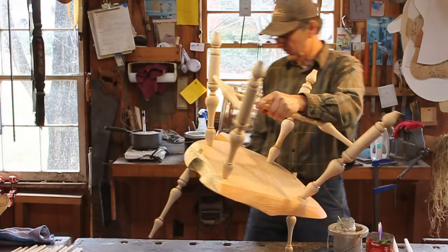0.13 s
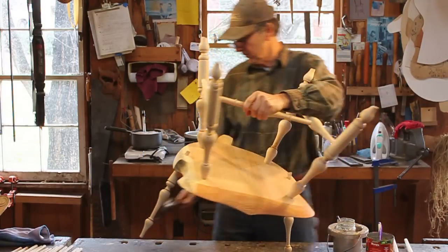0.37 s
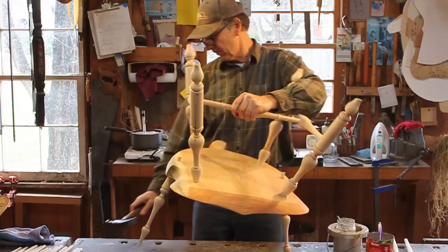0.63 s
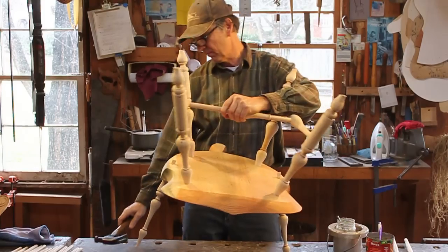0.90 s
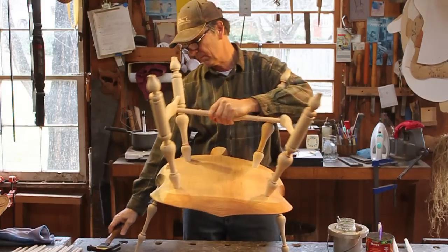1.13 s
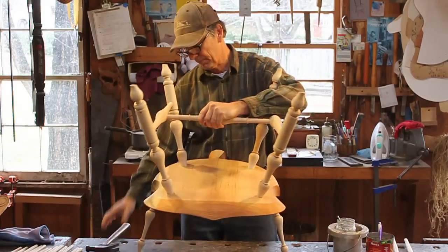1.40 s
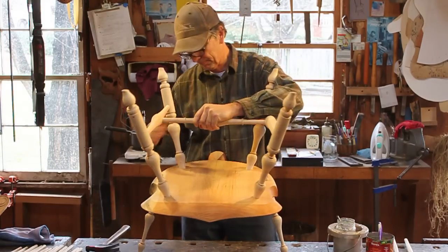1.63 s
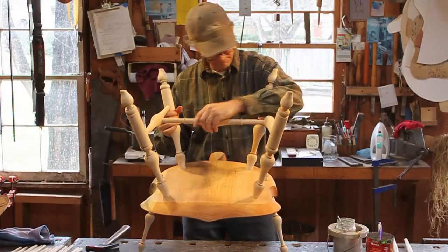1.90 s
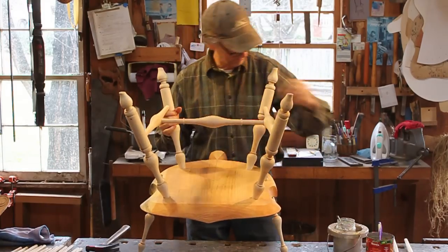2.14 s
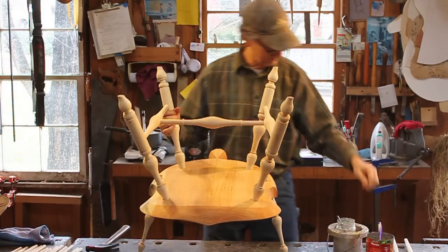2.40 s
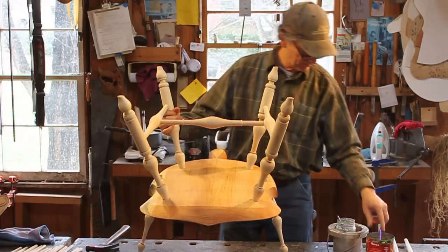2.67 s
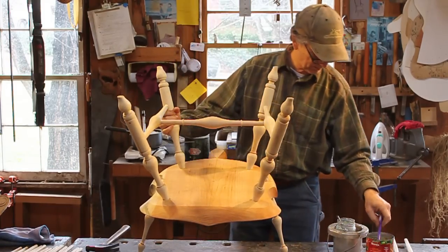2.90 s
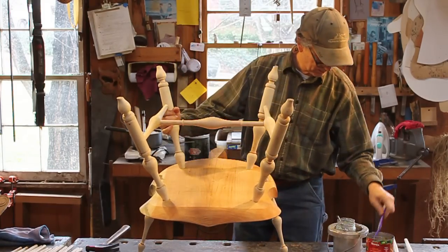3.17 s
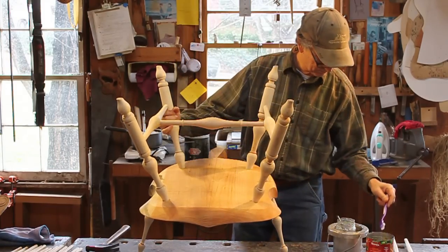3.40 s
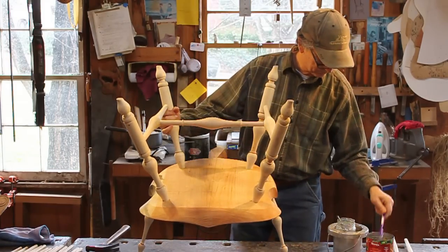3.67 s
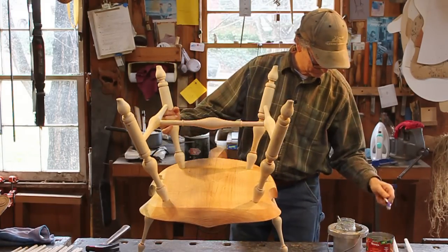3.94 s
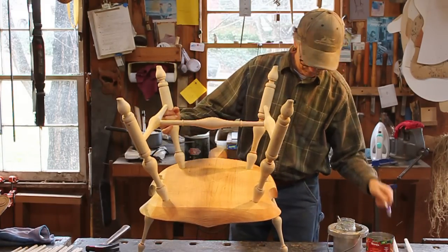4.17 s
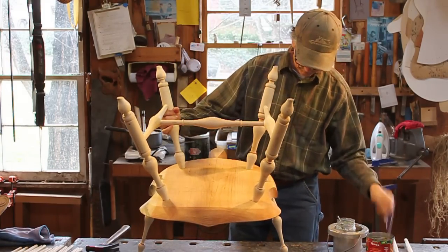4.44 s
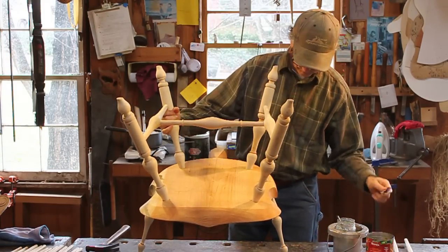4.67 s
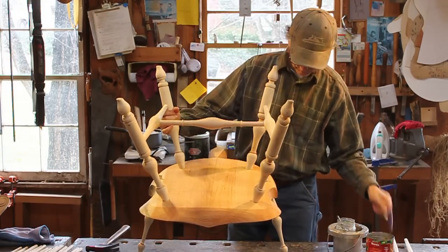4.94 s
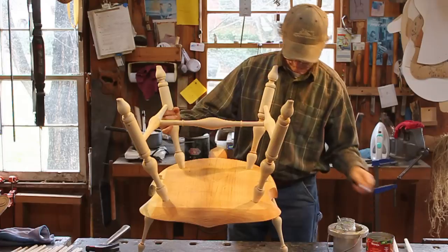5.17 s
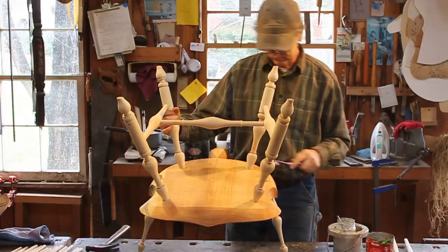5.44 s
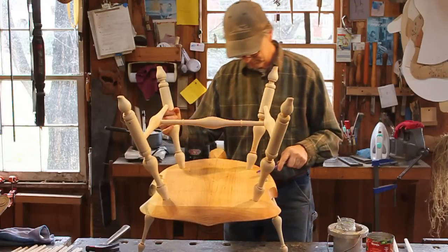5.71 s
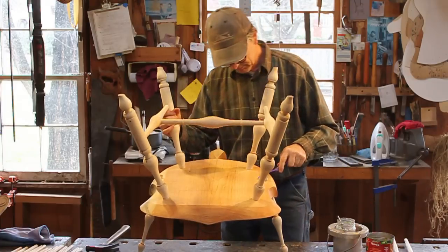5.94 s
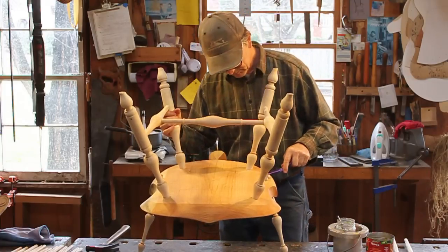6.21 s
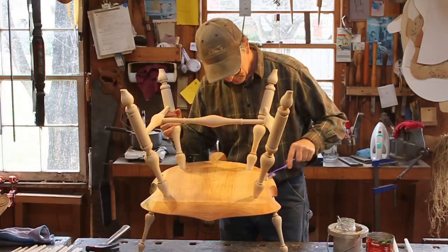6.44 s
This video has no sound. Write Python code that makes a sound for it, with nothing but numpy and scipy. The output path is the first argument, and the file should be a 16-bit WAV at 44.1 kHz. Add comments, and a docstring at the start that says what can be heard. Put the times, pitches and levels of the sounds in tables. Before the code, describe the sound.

A small, quiet wood workshop with soft clothing rustle and foot shuffle. A steel tool is set down with a sharp clack and short rattle on a wooden bench, followed by softer chair bumps. After a pause, a brush handle raps a tin can rim four times, bright and ringing but quickly damped, with short room reflections. Finally, faint bristles scrub inside a wooden socket. One fixed microphone, mono.

```python
"""Knocks of tools and a chair on a bench, then bright raps of a brush handle on a tin can rim, then brushing.
Raps: noisy cracks plus damped modes. Knocks: random contacts convolved with wood and steel modes.
Sleeves, feet, bristles and rumble are coloured noise under level curves; a faint hum wavers below.
The small shop answers knocks and raps with sparse taps that decay band by band. Both channels are equal."""
import sys
import numpy as np
from scipy import signal
from scipy.io import wavfile
from scipy.ndimage import uniform_filter1d

SR = 44100
rng = np.random.default_rng(int(sys.argv[2]) if len(sys.argv) > 2 else 0)


def dump_mix(stems):
    """Bounce the given channels to the path in sys.argv[1] as a 16-bit WAV at rate SR."""
    frames = np.atleast_2d(stems).T  # one column per channel
    limited = np.clip(frames, -1, 1)  # hard clip at full scale
    pcm = np.round(limited * 32767).astype(np.int16)
    wavfile.write(sys.argv[1], SR, pcm)


def invert_db(level):
    """Linear amplitude ratio for a level in decibels (20 dB per decade), elementwise."""
    return 10 ** (np.asarray(level, dtype=float) / 20)


N = 290178
SIDES = 3  # radiation directions; index 0 faces the microphone


def evened(x):
    """Scales to unit rms."""
    return x / np.sqrt(np.mean(x ** 2) + 1e-20)


def read(points, hz):
    """Interpolates a curve over log frequency."""
    f, value = np.transpose(points)
    return np.interp(np.log(hz + 1), np.log(f + 1), value)


def add(mix, s, sound):
    """Mixes a sound in at s seconds, cut at the end of the mix."""
    part = mix[:, round(s * SR):][:, :sound.shape[1]]
    part += sound[:, :part.shape[1]]


def ring(modes, weight_db, hold):
    """Damped sines at unit energy; strike spot and direction vary mode levels and signs."""
    hz, db, t60_s = np.transpose(modes)[:, :, None]
    t = np.arange(SR // 4) / SR
    luck_db = 1.5 * rng.standard_normal((SIDES, len(modes)))
    sign = rng.choice([-1., 1.], luck_db.shape)
    sign[0] = (-1.) ** np.arange(len(modes))
    envelope = invert_db(db + weight_db(hz) - 60 * t / (hold * t60_s))
    sines = envelope * np.sin(2 * np.pi * hz * t)
    sound = (sign * invert_db(luck_db)) @ sines
    return sound / np.linalg.norm(sound, axis=1, keepdims=True)


def hiss(spectrum, patchy_db, size):
    """Coloured noise at unit rms; level drifts in patches over time and frequency."""
    hop = size // 4
    frames, hz = N // hop + 5, np.fft.rfftfreq(size, 1 / SR)
    real, imag, patches = rng.standard_normal((frames, len(hz), 3)).T
    patches = uniform_filter1d(uniform_filter1d(patches, 12, 0), 12, 1)
    gain_db = read(spectrum, hz)[:, None] + patchy_db * evened(patches)
    bins = (real + 1j * imag) * invert_db(gain_db)
    return evened(signal.istft(bins, nperseg=size, noverlap=size - hop)[1][:N])


SWELL_DB = 3.5  # drop one rise time before and one fall time after the peak


def swell(s, rise_s, fall_s, db):
    """Bell-shaped gain with separate rise and fall."""
    t = np.arange(N) / SR - s
    drop_db = SWELL_DB * (t / np.where(t < 0, rise_s, fall_s)) ** 2
    return invert_db(db - np.minimum(drop_db, 200))


# building rumble spectrum: f/Hz, relative level/dB per Hz
RUMBLE_SPECTRUM = [(12, -74), (20, -27), (70, 12), (108, -35), (129, -43), (145, -10), (160, -9), (210, -7),
                   (350, -120)]
RUMBLE_DB = -76.5


def rumble():
    """Building rumble: patchy low-frequency noise."""
    return invert_db(RUMBLE_DB) * hiss(RUMBLE_SPECTRUM, patchy_db=2, size=2048)


# mains hum: f/Hz, level/dB rms before waver
MAINS_HUM = (119.5, -76.5)


def hum():
    """Mains hum: one sine whose level wavers slowly and randomly."""
    hz, db = MAINS_HUM
    waver = rng.standard_normal(N)
    waver = uniform_filter1d(uniform_filter1d(waver, SR // 5), SR // 5)
    level_db = db + 3 * evened(waver)
    return invert_db(level_db) * np.sqrt(2) * np.sin(2 * np.pi * hz * np.arange(N) / SR)


# room bands: f/Hz, t60/s, return level/dB before wet_db
SHOP_BANDS = [(118.4, 0.55, 14), (326, 0.47, 4.5), (860, 0.45, 7), (2200, 0.34, 4), (5880, 0.31, 0.5),
              (12900, 0.2, -6.5)]


def shop(x, wet_db):
    """Direct sound plus sparse random-sign wall taps per direction; each band has its own decay."""
    taps = np.zeros((SIDES, SR))
    at = np.arange(160, SR - 20, 20)
    at = at + rng.integers(0, 20, (SIDES, len(at)))
    np.put_along_axis(taps, at, rng.choice([-1., 1.], at.shape), 1)
    hz, t, bins = signal.stft(taps, SR, nperseg=256)
    band_hz, t60_s, back_db = np.transpose(SHOP_BANDS)
    t60_s = read(np.transpose([band_hz, t60_s]), hz)[:, None]
    back_db = read(np.transpose([band_hz, back_db]), hz)[:, None]
    decay = invert_db(-60 * t / t60_s)
    decay *= invert_db(back_db) / np.linalg.norm(decay, axis=1, keepdims=True)
    tail = signal.istft(bins * decay, SR, nperseg=256)[1]
    wet = signal.fftconvolve(x, tail, axes=1)[:, :N].sum(0) / np.sqrt(SIDES)
    return x[0] + invert_db(wet_db) * wet


# worker activity: t/s, level/dB
BUSTLE_CURVE = [(0, -14), (0.25, -9), (0.4, -5), (1.0, -8), (1.8, -5.5), (2.5, -3), (3.1, 2.5), (3.6, 0.5),
                (4.401, -1), (5.3, -1.5), (5.6, 3.5), (5.9, 0), (6.58, 3)]


def bustle():
    """Activity curve in dB that drives rustle and shuffle."""
    return np.interp(np.arange(N) / SR, *np.transpose(BUSTLE_CURVE))


# foot shuffle spectrum: f/Hz, relative level/dB per Hz
SHUFFLE_SPECTRUM = [(59, -18), (100, -7), (162, -8.5), (237, -6), (524, -10), (584, -7.5), (1440, -13.5),
                    (1620, -16.5), (2500, -17.5), (3250, -30), (5500, -120)]
SHUFFLE_DB, SHUFFLE_SLOPE = -62.5, 1  # level at 0 dB bustle; dB per dB of bustle


def shuffle(busy_db):
    """Feet shuffle: low noise that follows activity."""
    level = invert_db(SHUFFLE_DB + SHUFFLE_SLOPE * busy_db)
    return level * hiss(SHUFFLE_SPECTRUM, patchy_db=0.86, size=1024)


# friction body, cloth and bristles: f/Hz, relative level/dB per Hz
SWISH_SPECTRUM = [(530, -22), (900, -26), (1800, -6), (1980, -8), (3060, -3.5), (4670, -5.5), (5250, -6),
                  (8000, -13.5), (10400, -20.5), (17600, -120)]
# friction treble, cloth and bristles: f/Hz, relative level/dB per Hz
FIZZ_SPECTRUM = [(3820, -15), (6500, -5), (10900, -3), (13600, -4), (14300, -42), (15000, -29.5)]
# sleeve along shirt: t/s of fastest point, rise/s, fall/s, level/dB, treble level/dB re sweep
SLEEVE_SWEEPS = [(0.645, 0.067, 0.049, -57.5, -10.5), (1.93, 0.096, 0.044, -67, -3.5),
                 (2.26, 0.1, 0.038, -68.5, -9), (2.8, 0.11, 0.12, -51.5, -9)]
RUSTLE_DB = -67.5  # at 0 dB bustle
RUSTLE_TOP_DB, RUSTLE_TOP_SLOPE = -72, 0.93  # treble at 0 dB bustle; dB per dB of bustle


def cloth(busy_db):
    """Sleeve friction: body and treble noise; sweeps add in power to the steady rustle."""
    sweeps, top_sweeps = 0, 0
    for s, rise_s, fall_s, db, top_db in SLEEVE_SWEEPS:
        sweep = swell(s, rise_s, fall_s, db)
        sweeps = sweeps + sweep
        top_sweeps = top_sweeps + sweep * invert_db(top_db)
    swish = np.hypot(invert_db(RUSTLE_DB + busy_db), sweeps)
    fizz = np.hypot(invert_db(RUSTLE_TOP_DB + RUSTLE_TOP_SLOPE * busy_db), top_sweeps)
    body = swish * hiss(SWISH_SPECTRUM, patchy_db=0.6, size=512)
    return body + fizz * hiss(FIZZ_SPECTRUM, patchy_db=0.5, size=512)


# leg socket resonances: f/Hz, width/Hz, relative level/dB
SOCKET_HOLLOW = [(800, 12, 11.5), (1346, 65, 11), (2030, 23, 10.5)]
# brush in leg socket: t/s of peak pressure, rise/s, fall/s, level/dB
BRUSH_STROKES = [(6.005, 0.023, 0.029, -69.5), (6.21, 0.077, 0.032, -66.5), (6.35, 0.036, 0.074, -66.5),
                 (6.48, 0.054, 0.035, -61)]
BRISTLE_TOP_DB, HOLLOW_DB = 3.5, -12.5  # re stroke


def brush():
    """Bristles hiss on wood; noise through resonators sounds the hollow of the socket."""
    noise = rng.standard_normal(N)
    hollow = np.zeros(N)
    for hz, width_hz, db in SOCKET_HOLLOW:
        b, a = signal.iirpeak(hz, hz / width_hz, SR)
        hollow += invert_db(db) * evened(signal.lfilter(b, a, noise))
    bristles = hiss(SWISH_SPECTRUM, patchy_db=3.8, size=256)
    bristles = bristles + invert_db(BRISTLE_TOP_DB) * hiss(FIZZ_SPECTRUM, patchy_db=1.8, size=256)
    pressure = sum(swell(*row) for row in BRUSH_STROKES)
    smooth_pressure = uniform_filter1d(pressure, size=SR // 6)
    return pressure * bristles + invert_db(HOLLOW_DB) * smooth_pressure * hollow


# wood and tools on bench: t/s, level/dB, weight f/Hz, fall either side/dB per octave, steel level/dB re wood
BENCH_KNOCKS = [(0.269, -32, 145, 5.5, -60), (0.329, -57, 70, 23, -60), (0.427, -43, 1900, 26, -60),
                (0.483, -62, 730, 10, -60), (1.157, -16, 646, 11, -38), (1.167, -13, 530, 8.5, -35),
                (1.344, -21.5, 620, 24, -60), (1.379, 4, 1510, 5.5, -13.5), (1.414, -8.5, 377, 3.5, -6),
                (1.44, -9, 613, 8, -18), (1.508, -8, 437, 4.5, -17.5), (1.54, -21.5, 300, 1, -8),
                (1.696, -23, 800, 3, -46.5), (1.729, -32.5, 2100, 3.5, -47), (1.842, -28, 800, 16, -53),
                (1.866, -15.5, 420, 7, -46), (1.905, -22.5, 400, 13, -49), (1.974, -49, 400, 19, -56),
                (2.289, -44, 146, 13, -67), (3.07, -34.5, 530, 21, -36), (3.28, -37.5, 274, 13, -58),
                (5.0282, -17.5, 1340, 9.5, -36), (5.42, -37.5, 251, 11.5, -66)]
# bench top and chair seat modes: f/Hz, relative level/dB, t60/s before hold
BENCH_MODES = [(61, -8.5, 0.15), (129.8, -8.5, 0.21), (161.5, -7, 0.058), (184.6, -2.5, 0.15),
               (266, -0.6, 0.078), (360, -0.5, 0.11), (419, 0.7, 0.07), (512, -0.5, 0.032),
               (586, 3.1, 0.025), (677, -10, 0.051), (825, 6, 0.018), (1010, 1.5, 0.011), (1040, -3, 0.02),
               (1300, -2.5, 0.018), (1665, 2.5, 0.01), (1900, -5.5, 0.032), (2100, 0, 0.015),
               (2520, -5, 0.015), (3020, -6, 0.0039), (3610, -6.5, 0.015), (4060, -7.5, 0.018),
               (5500, -30, 0.004), (7160, -8, 0.0064), (9200, -59, 0.0033), (11400, -54, 0.0048)]
# steel tool modes: f/Hz, relative level/dB, t60/s before hold
TOOL_MODES = [(2880, -3, 0.028), (4140, -0.5, 0.02), (4825, -2, 0.03), (4960, -6, 0.034),
              (5460, 5.5, 0.0044), (5880, 5, 0.0053), (5900, -1, 0.0065), (6900, -12.5, 0.027),
              (7200, -15.5, 0.036), (8100, -22, 0.0083), (9000, -15, 0.023), (12200, -9, 0.003)]
BENCH_BASS_HZ = 99
RATTLE_S = 0.0083  # amplitude time constant of small contacts


def bench():
    """One blow plus a fading rattle of contacts excites wood and steel; deep bass radiates poorly."""
    out, t = np.zeros((SIDES, N)), np.arange(SR // 8) / SR
    for s, db, weight_hz, fall_db, tool_db in BENCH_KNOCKS:
        chance, size = rng.random((2, SIDES, len(t)))
        contacts = (chance < 300 / SR) * (size - .4) * np.exp(-t / RATTLE_S)  # 300 per s
        contacts[:, 0] = 1
        wood = ring(BENCH_MODES, lambda hz: -fall_db * abs(np.log2(hz / weight_hz)), hold=0.84)
        steel = ring(TOOL_MODES, lambda hz: 0, hold=0.88)
        body = wood + invert_db(tool_db) * steel
        add(out, s, invert_db(db) * signal.fftconvolve(contacts, body, axes=1))
    return signal.lfilter(*signal.butter(3, BENCH_BASS_HZ, "high", fs=SR), out)


# first instant of a rap: f/Hz, relative level/dB per Hz
CRACK_SPECTRUM = [(290, -25), (500, -10), (823, -21), (2230, -2), (2990, -8), (4500, -1.5), (5530, -2.5),
                  (5950, -10), (7860, 0), (8710, -10), (10100, -4), (10700, -10), (12600, -0.5),
                  (14500, -5.5), (16600, -19)]
# echo off bench top under can: delay/s, level/dB
BENCH_ECHO = (.001, -7)


def crack():
    """Minimum-phase click roughened by decaying contact noise, with an inverted bench echo; unit energy."""
    hz = abs(np.fft.fftfreq(2048, 1 / SR))
    log_gain = np.log(invert_db(read(CRACK_SPECTRUM, hz)))
    click = np.fft.ifft(np.exp(signal.hilbert(log_gain).conj())).real[:1024]
    i = np.arange(256)
    contact = .25 * rng.standard_normal(256) * invert_db(-60 * i / SR / .008)  # t60 8 ms
    contact[0] += 1
    delay_s, echo_db = BENCH_ECHO
    contact[round(delay_s * SR)] -= invert_db(echo_db)
    sound = np.convolve(click, contact)
    return sound / np.linalg.norm(sound)


# raps on can: t/s, ring level/dB, brightness/dB per octave, crack level/dB re ring
CAN_RAPS = [(3.66, 1, 0, 5.5), (4.1158, 1, 1, 5.5), (4.387, -31, -3, -4), (4.394, -50, -17, -4),
            (4.427, -49, -18, -22), (4.523, -0.5, -1.5, 7.5), (4.8305, 0, -1, 5.5), (5.0261, -16, -2.5, -5)]
# can modes: f/Hz, relative level/dB, free t60/s before grip
CAN_MODES = [(310, -1.5, 0.058), (590, -41, 0.081), (829, -10.5, 0.2), (1900, 0.5, 0.054), (2107, 0, 0.058),
             (3150, -10, 0.029), (3540, 14, .04), (4500, -3, 0.012), (4564, 12, 0.12), (4730, -3, 0.015),
             (5206, 18, 0.03), (5660, 16, 0.03), (6860, -27, 0.014), (6600, 12.5, 0.12),
             (6470, 18.5, 0.024), (8150, -26, 0.026), (7880, 4, 0.016), (8100, -26, 0.021),
             (9300, -26, 0.016), (9840, 0, 0.051), (11600, -18, 0.022), (12900, 2, 0.0063), (1335, -9, .5),
             (1760, -11, .45), (2205, 0, .35), (2245, 1, .5), (2285, -2, .35), (2605, -5, .5),
             (3495, -4, .45), (3578, -6, .45), (4580, 2, .4), (4790, -2, .3), (5390, -5, .4), ]
CAN_BASS_HZ = 195
GRIP = 0.5  # share of free t60 left by the hand


def can():
    """Handle strikes rim: crack, then hand-damped modes; the small can radiates little bass."""
    out = np.zeros((SIDES, N))
    for s, db, tilt_db, crack_db in CAN_RAPS:
        add(out, s, invert_db(db) * ring(CAN_MODES, lambda hz: tilt_db * np.log2(hz), GRIP))
        cracks = np.array([crack() for side in range(SIDES)])
        add(out, s, invert_db(db + crack_db) * cracks)
    return signal.lfilter(*signal.butter(2, CAN_BASS_HZ, "high", fs=SR), out)


def scene():
    """Sums all sources at one microphone, which feeds both channels."""
    busy_db = bustle()
    stir = rumble() + hum() + shuffle(busy_db) + cloth(busy_db)
    mono = stir + brush() + shop(bench(), wet_db=-4.5) + shop(can(), wet_db=-5.5)
    return np.array([mono, mono])


def top_cut(x):
    """Nothing passes above the cut-off."""
    return signal.sosfilt(signal.butter(12, 17130, fs=SR, output="sos"), x)


CEILING = 1.1  # input stage rounds peaks towards this height
EDGE_HZ = 16950


def record(dry):
    """Soft input overload, then a linear-phase low-pass."""
    rounded = CEILING * np.tanh(dry / CEILING)
    lowpass = signal.firwin(255, EDGE_HZ, window=("kaiser", 9), fs=SR)
    mix = signal.oaconvolve(rounded, lowpass[None], "same")
    return top_cut(mix)


dry = scene()
out = record(dry)
dump_mix(out)
```